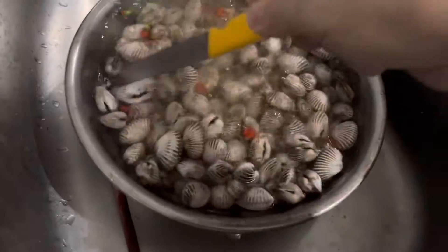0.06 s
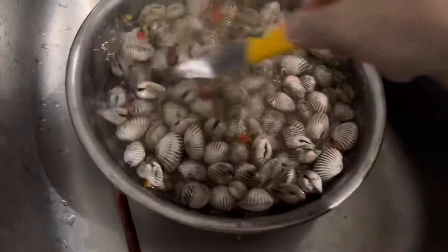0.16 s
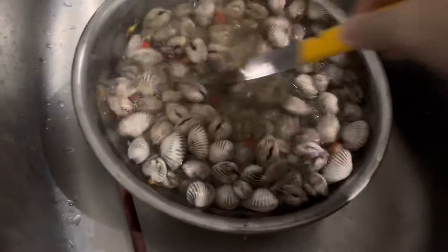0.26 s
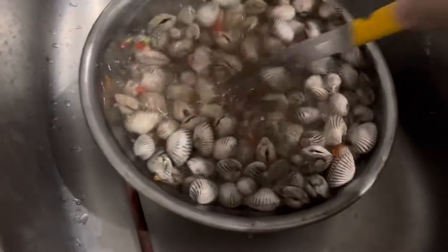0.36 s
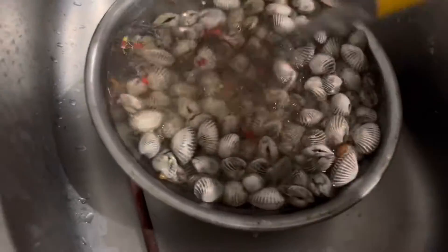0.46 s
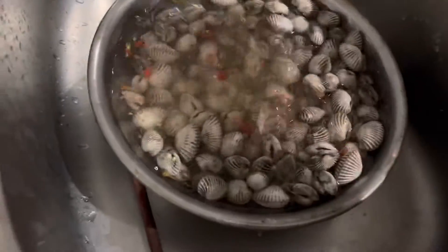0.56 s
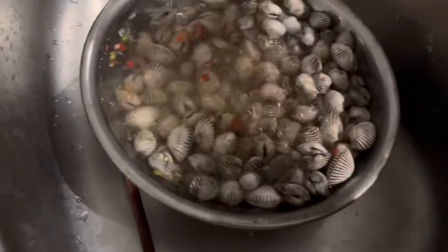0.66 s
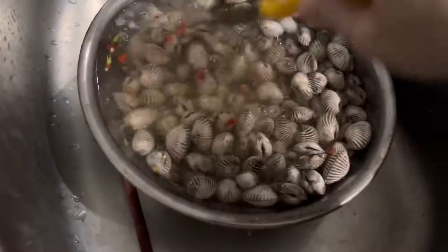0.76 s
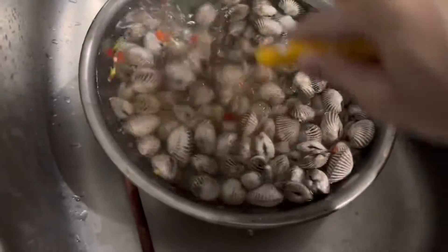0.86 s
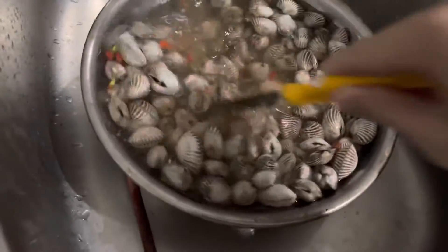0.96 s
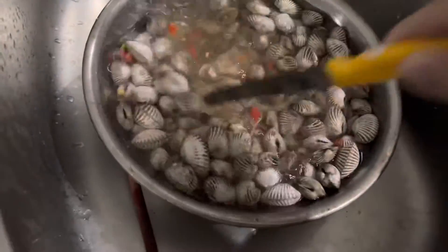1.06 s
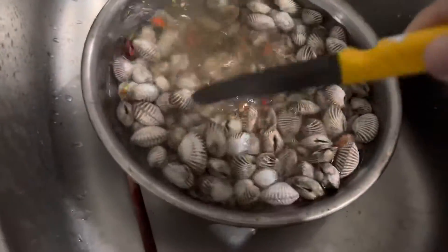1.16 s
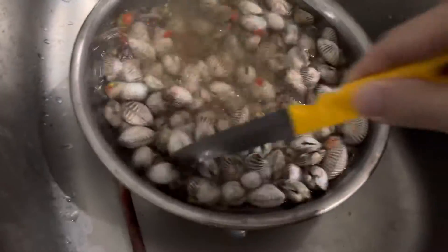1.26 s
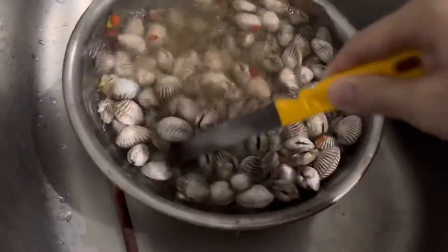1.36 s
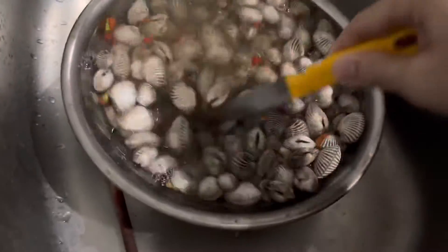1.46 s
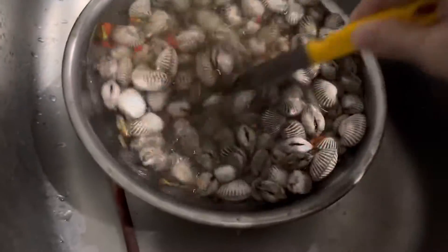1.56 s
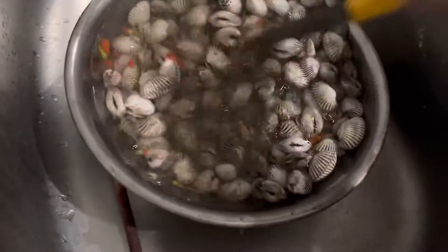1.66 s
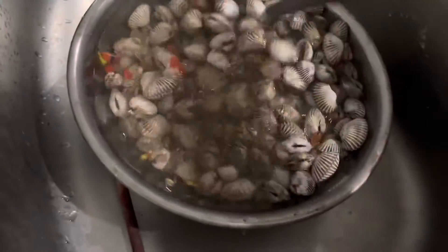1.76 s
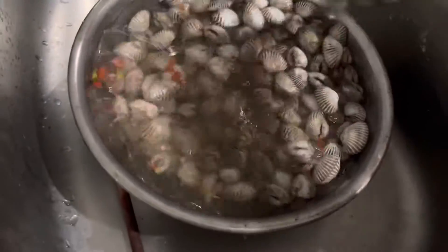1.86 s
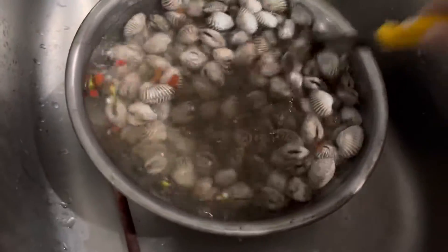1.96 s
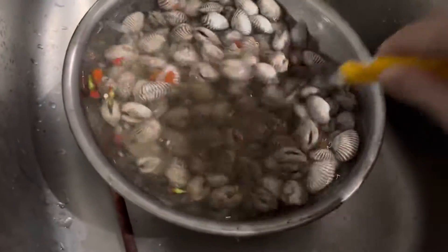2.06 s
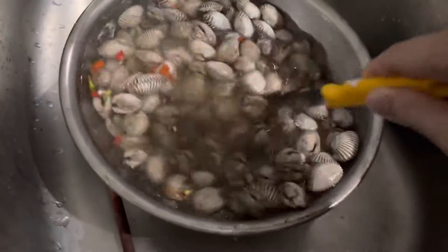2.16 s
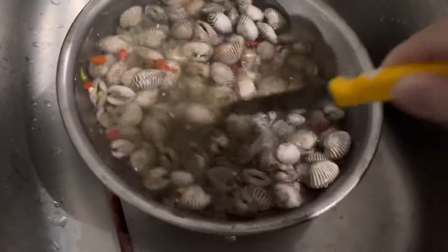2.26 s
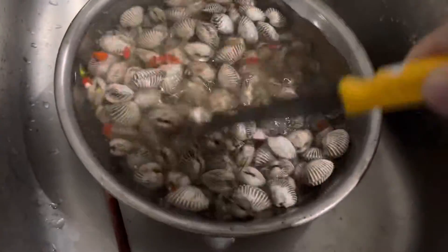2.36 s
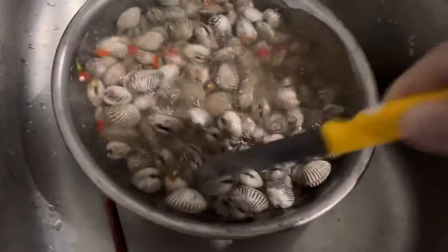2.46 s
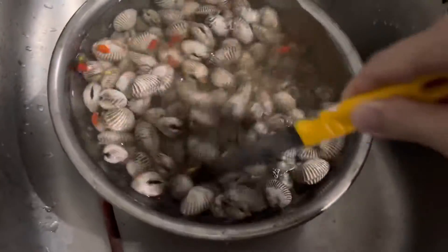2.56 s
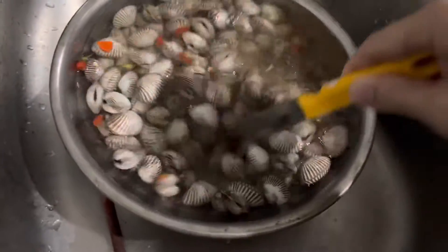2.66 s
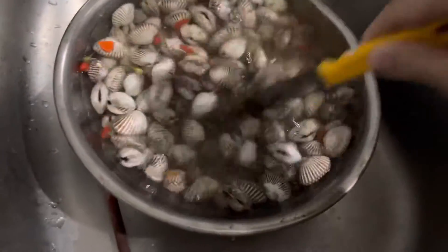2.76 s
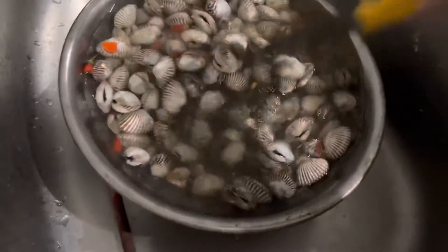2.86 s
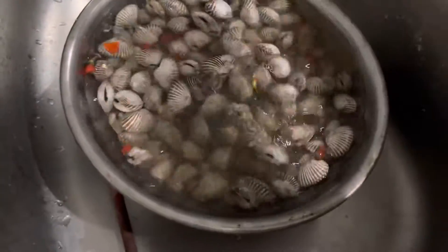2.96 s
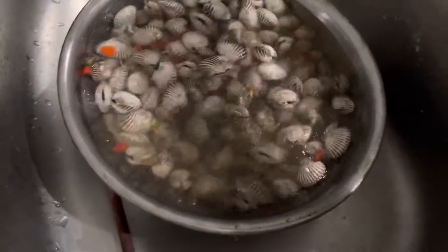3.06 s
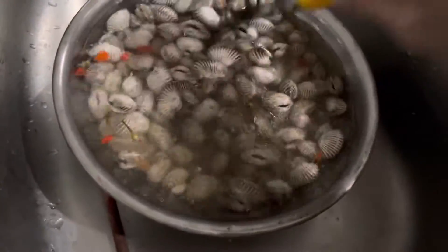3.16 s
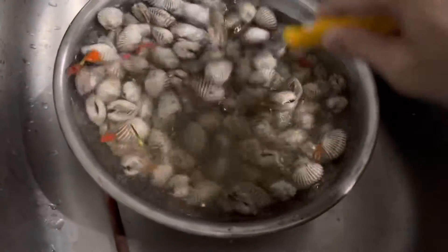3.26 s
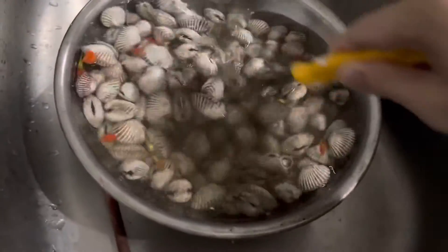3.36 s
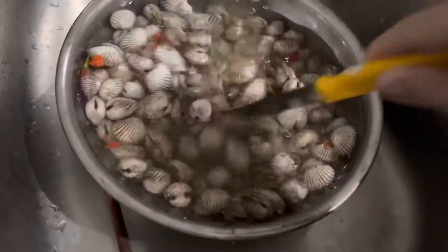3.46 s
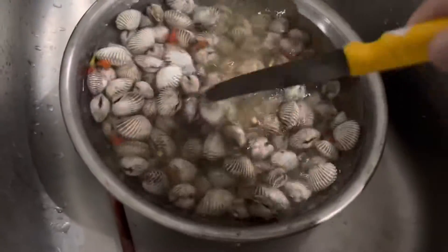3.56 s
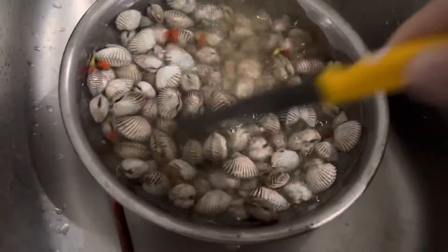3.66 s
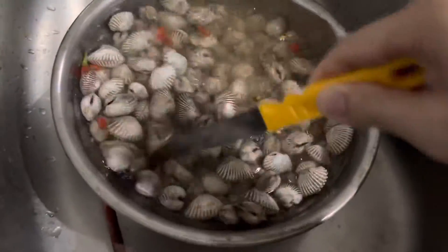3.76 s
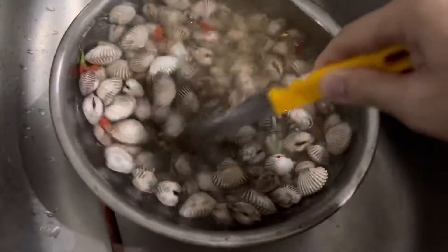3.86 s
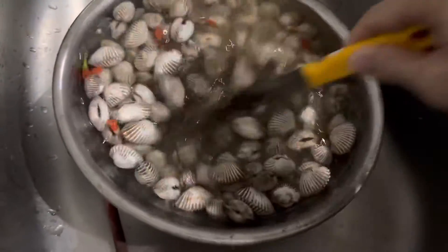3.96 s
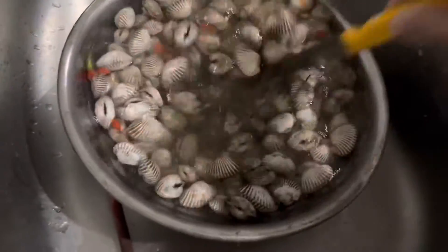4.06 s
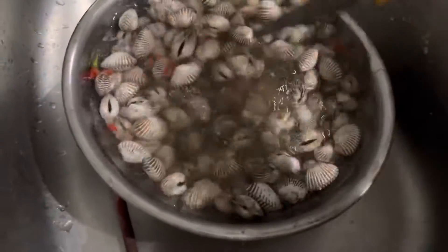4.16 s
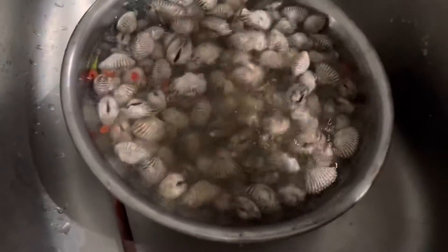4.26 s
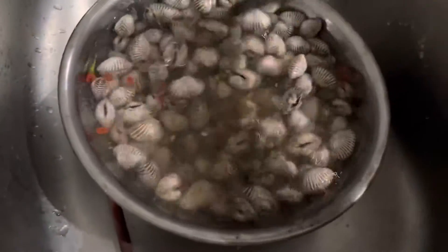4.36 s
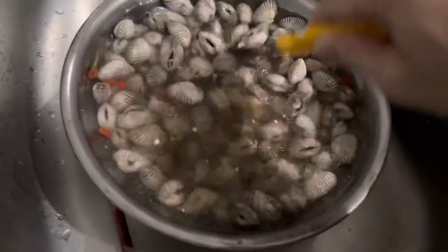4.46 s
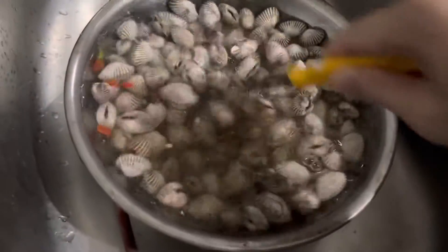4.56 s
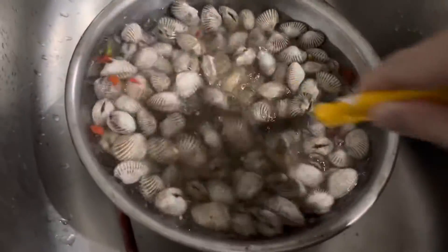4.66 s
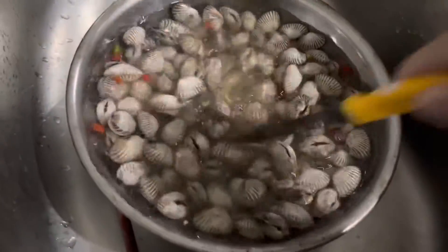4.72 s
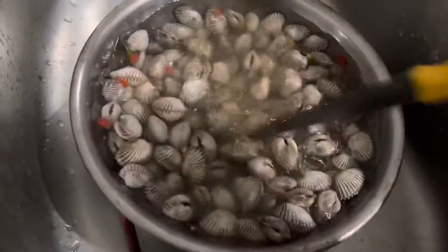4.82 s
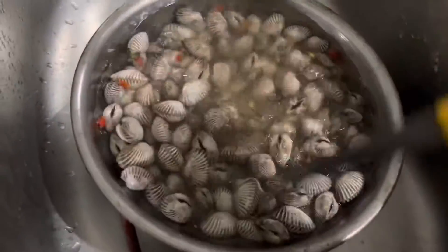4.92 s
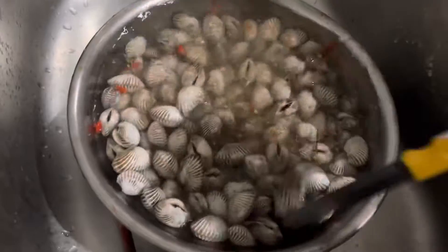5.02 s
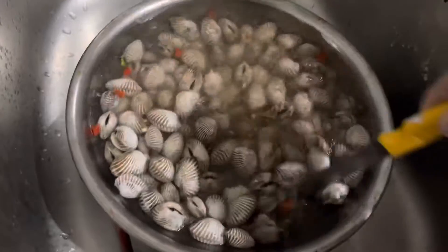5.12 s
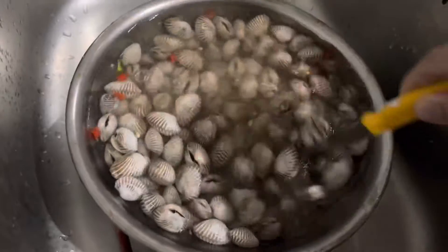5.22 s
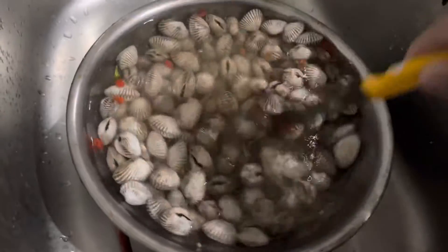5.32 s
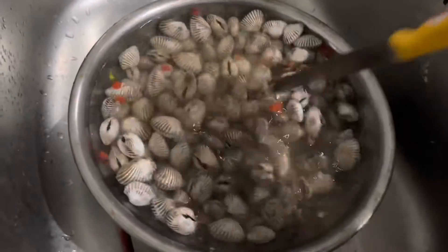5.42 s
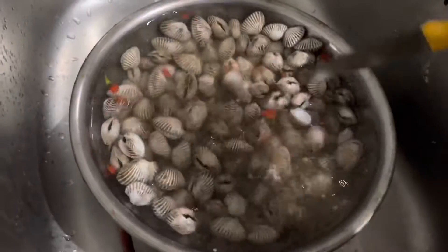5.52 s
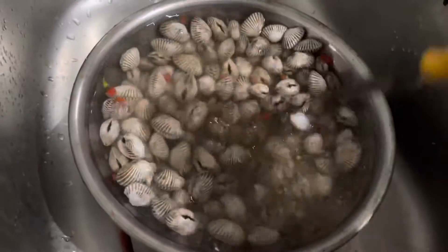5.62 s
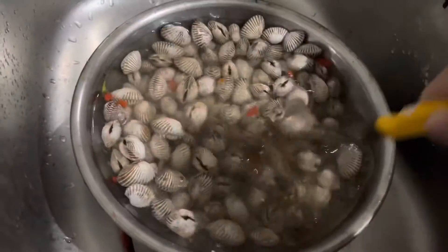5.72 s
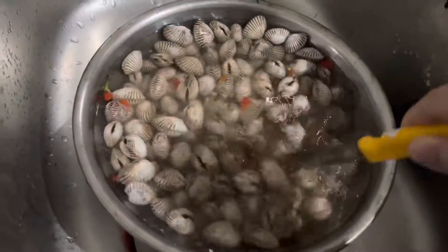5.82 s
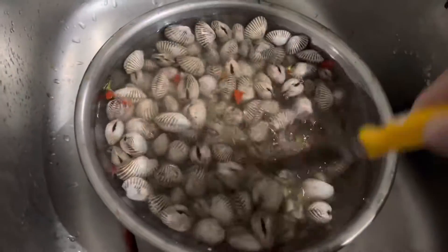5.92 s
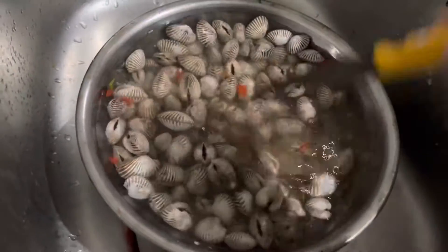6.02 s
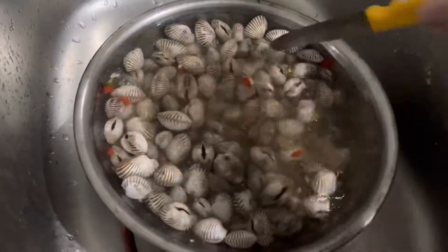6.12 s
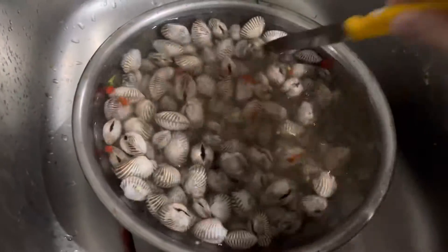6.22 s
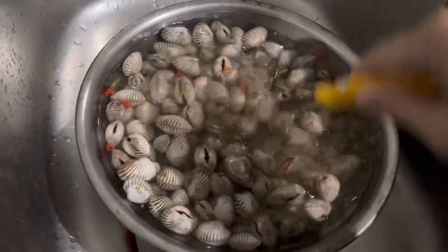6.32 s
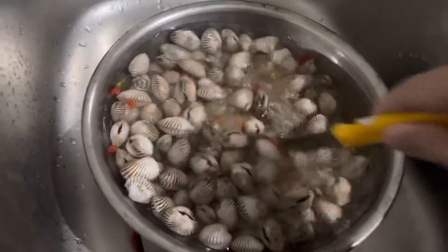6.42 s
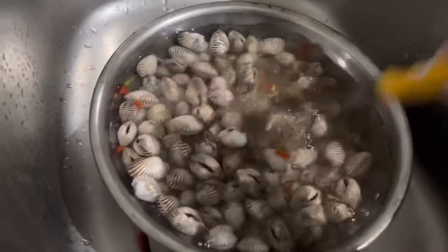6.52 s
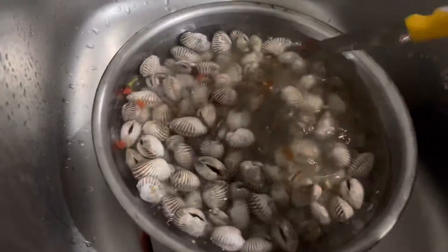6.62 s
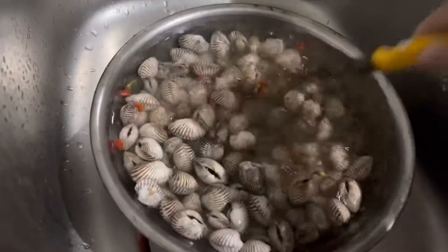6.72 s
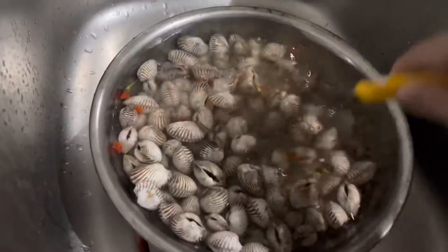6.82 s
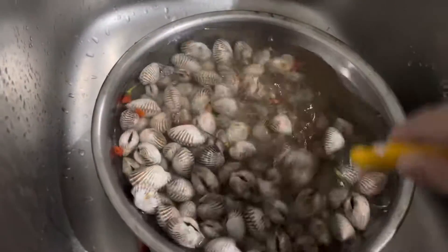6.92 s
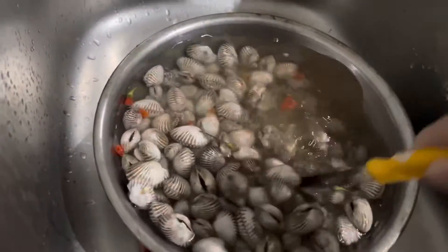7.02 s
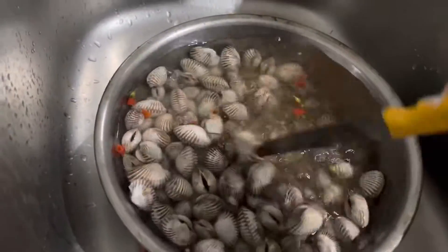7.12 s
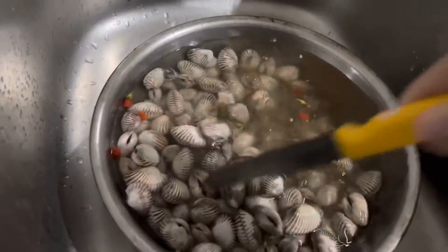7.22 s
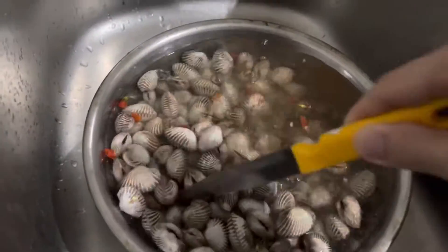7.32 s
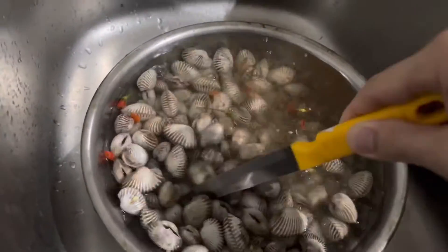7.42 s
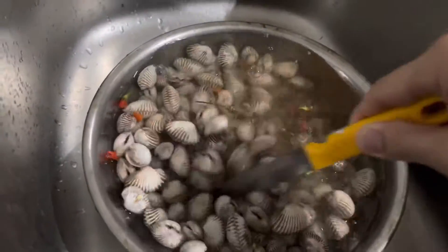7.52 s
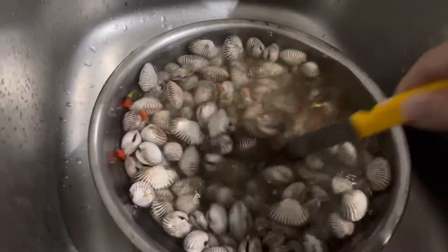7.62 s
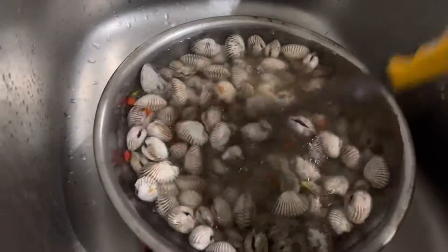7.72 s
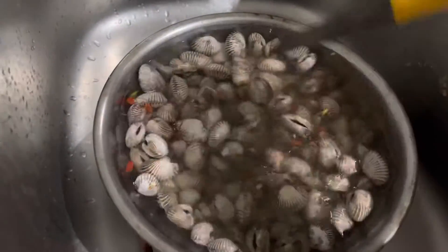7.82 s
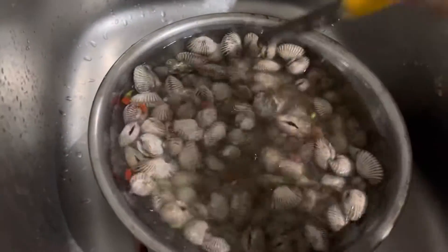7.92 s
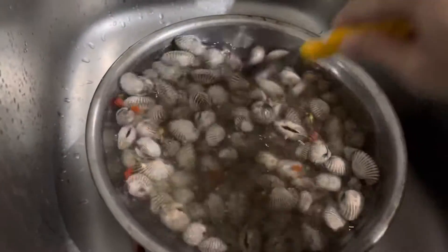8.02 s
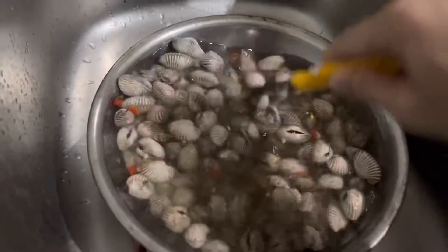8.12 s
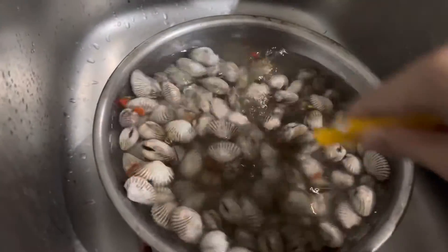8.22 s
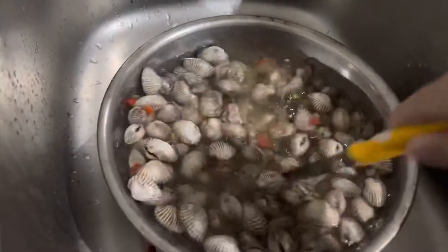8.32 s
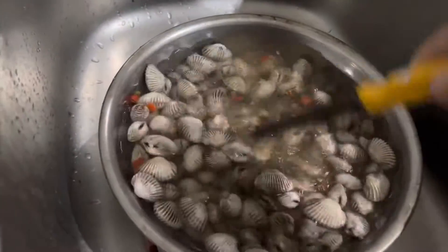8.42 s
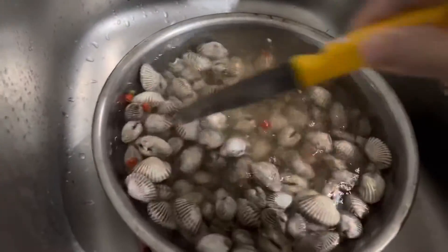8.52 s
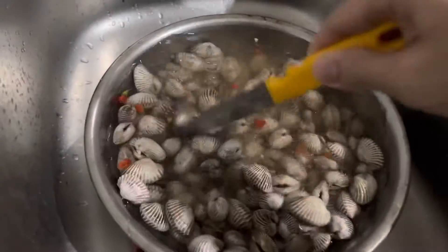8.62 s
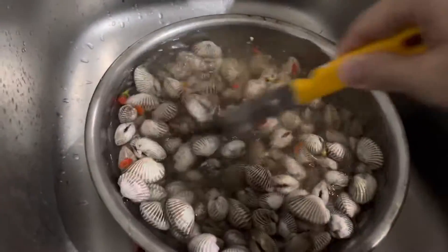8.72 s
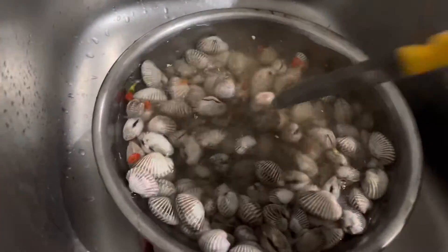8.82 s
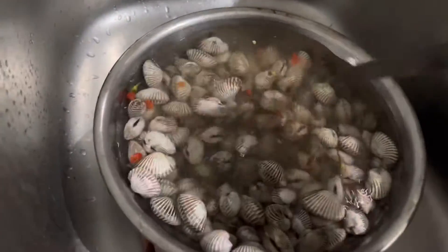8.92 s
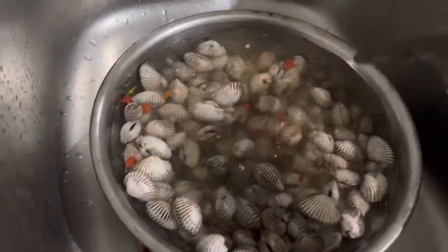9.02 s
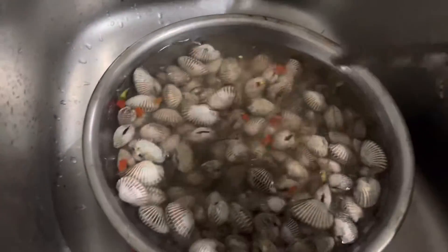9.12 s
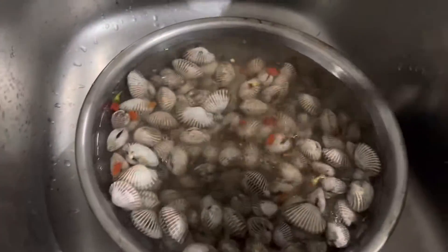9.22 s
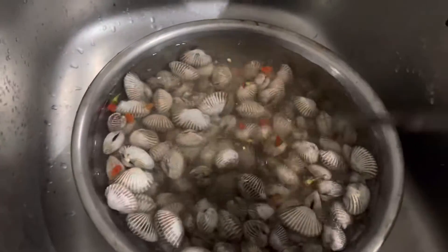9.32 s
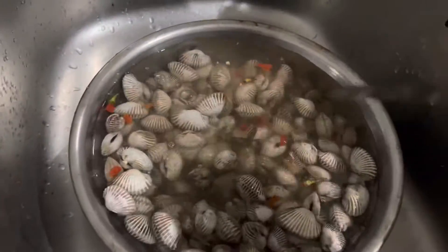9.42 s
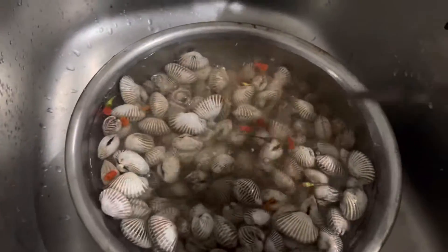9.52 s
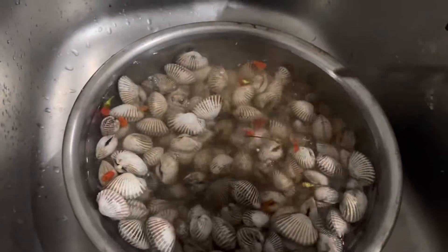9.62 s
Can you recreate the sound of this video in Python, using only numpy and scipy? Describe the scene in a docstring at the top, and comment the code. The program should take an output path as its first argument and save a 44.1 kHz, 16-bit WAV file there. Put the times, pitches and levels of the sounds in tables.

```python
"""Cockles grind and clatter as a knife stirs them in a steel bowl of water: fourteen strokes and a short dip.
Each stroke ticks on the top shells, bumps the bowl on the kitchen sink's floor and ploughs through
the heap. Shells grind under water and click above it, bowl and sink ring, the water gulps and settles.
A close stereo microphone hears it over short echoes and the room's faint rumble and hiss."""
import sys
import numpy as np
from scipy import signal
from scipy.fft import rfft, irfft, next_fast_len
from scipy.io import wavfile
from scipy.ndimage import map_coordinates

SR = 44100
rng = np.random.default_rng(int(sys.argv[2]) if len(sys.argv) > 2 else 0)


def wrap_up_sound(samples):
    """Save the sound to the file named by the first command line argument, as 16-bit audio."""
    columns = np.atleast_2d(samples).T
    # keep every value between -1 and 1, then stretch to whole-number steps
    tamed = np.clip(columns, -1, 1)
    steps = np.round(tamed * 32767).astype(np.int16)
    wavfile.write(sys.argv[1], SR, steps)


N = 426888
TOP_HZ = 16100

# knife strokes: (touch [s], touch to plunge [s], touch to crest [s], grinding at plunge [dB],
# grinding at crest [dB], clatter at crest [dB], settling [dB/s], touch tick [dB], bump [dB])
KNIFE_STROKES = [ (0.0198, 0.031, 0.23, -31.5, -22, -23, 68.5, -19, -19),
                 (0.6978, 0.023, 0.2, -25, -23, -25, 83.5, -12.5, -17.5),
                 (1.261, 0.035, 0.2, -29, -18.5, -22, 70, -13.5, -28.5),
                 (1.932, 0.028, 0.19, -29.5, -21.5, -22.5, 91, -10, -28),
                 (2.4534, 0.076, 0.16, -32.5, -20, -22.5, 53.5, -13, -28.5),
                 (3.0905, 0.029, .239, -35, -18.5, -22, 85.5, -13, -19.5),
                 (3.7324, 0.044, 0.21, -27, -18.5, -23.5, 62, -20, -21),
                 (4.372, 0.011, 0.24, -31, -21, -28, 88.5, -10.5, -28.5),
                 (4.9771, 0.072, 0.18, -35.5, -23.5, -23, 63, -15.5, -31),
                 (5.6458, 0.016, 0.15, -30, -28.5, -27.5, 46, -13.5, -26.5),
                 (6.204, 0.016, 0.12, -33.5, -18, -23, 80.5, -8.5, -20),
                 (6.7451, 0.062, .145, -31.5, -19.5, -23, 70.5, -14, -33.5),
                 (7.2873, 0.016, 0.29, -33.5, -21, -29.5, 83.5, -15, -26),
                 (7.9753, 0.016, 0.22, -29.5, -18, -22, 70.5, -13, -19.5),
                 (8.6316, .04, 0.041, -30, -29.5, -35.5, 133, -14.5, -35)]
# resonances of the bowl in the sink: (frequency [Hz], width [Hz], lift [dB])
BOWL_MODES = [(221.2, 15, 8.5), (315.3, 12.2, 12.5), (423, 52, 3.5), (499, 57, 7), (544, 30.5, 12.5),
              (669.5, 12, 8), (794, 19, 7.5), (851, 35, 8.5), (1012, 101, 11), (1251, 42, 4.5),
              (1467, 29, 6.5), (1676, 80, 10.5), (1930, 60, -12), (2507, 60, 8), (2923, 75, 10.5)]
# hollow slosh spectrum: (frequency [Hz], level [dB])
SLOSH_SPECTRUM = [(30, -20.5), (70, -4.5), (160, -6.5), (270, -4.5), (450, -0.5), (700, -9.5),
                  (1500, -19.5), (3000, -23), (9000, -55)]


def amp(db):
    """Decibels to gain."""
    return 10 ** (np.asarray(db) / 20)


def unit(x):
    """Scale to rms 1."""
    return x / np.sqrt(np.mean(x ** 2) + 1e-20)


def along(points, hz):
    """Read (Hz, value) points on a log axis."""
    f, v = np.transpose(points)
    return np.interp(np.log(hz + 1), np.log(f + 1), v)


def add(track, s, sound):
    """Mix a sound into a track at time s."""
    start = max(0, round(s * SR))
    part = track[start:start + len(sound)]
    part += sound[:len(part)]


def filtered(x, response):
    """Apply a complex function of frequency to x."""
    m = next_fast_len(N + SR // 2)
    return irfft(rfft(x, m) * response(np.fft.rfftfreq(m, 1 / SR)), m)[..., :N]


def through(x, response):
    """Convolve with an impulse response."""
    return signal.oaconvolve(x, response)[:N]


def body(spectrum, modes=(), size=16384):
    """Minimum-phase impulse response of energy 1: a broad spectrum plus resonances."""
    hz = np.fft.rfftfreq(size, 1 / SR)
    lift = 1 + sum((amp(db) ** 2 - 1) / (1 + (2 * (hz - f) / width) ** 2) for f, width, db in modes)
    cepstrum = irfft(np.log(amp(along(spectrum, hz)) * np.sqrt(np.abs(lift))))
    cepstrum[1:size // 2] *= 2
    cepstrum[size // 2 + 1:] = 0
    response = irfft(np.exp(rfft(cepstrum)))
    return response / np.linalg.norm(response)


def collisions(level_db, per_s, spread_db):
    """Random impulses, per_s at -25.5 dB; a harder push makes them denser and bigger."""
    chance = np.clip(per_s * amp(.38 * (level_db + 25.5)) / SR, 1e-5, 1)
    size = unit(amp(spread_db * np.minimum(rng.standard_normal(N), 1.8)))
    hits = (rng.random(N) < chance) * size * rng.choice([-1, 1], N)
    return hits * amp(level_db) / np.sqrt(chance)


def hush():
    """Low rumble and faint hiss of the room."""
    # room noise: (frequency [Hz], level [dB])
    spectrum = [(15, -37.5), (25, -21.5), (64, -4), (93, -14), (135, -7), (212, -31.5), (240, -24),
                (366, -29.5), (900, -39), (2420, -44.5), (4740, -51.5), (6200, -51), (7100, -38),
                (7700, -53), (9500, -72), (12400, -103), (20900, -120)]
    mid, side = unit(filtered(rng.standard_normal((2, N)), lambda hz: amp(along(spectrum, hz))))
    return amp(-47) * np.array([mid + amp(-10) * side, mid - amp(-40.5) * side])


def shell_click(ring_hz=4780, ring_t60_s=.07, crack_t60_s=.028, scatter_t60_s=.086):
    """One contact: a hard crack, its scatter among the shells and six inharmonic modes."""
    t = np.arange(SR // 12) / SR
    hz = ring_hz * np.exp(rng.uniform(-.6, .64, size=6))
    ring = unit(np.sin(2 * np.pi * hz[:, None] * t).sum(0)) * amp(-9.5 - 60 * t / ring_t60_s)
    fade = amp(-60 * t / crack_t60_s) + amp(-7 - 60 * t / scatter_t60_s)
    return rng.standard_normal(len(t)) * fade + ring


def contacts(touch_knock_db=-13.5, glint_db=-11):
    """The blade hits a shell, skips on its ribs and knocks the bowl; its edge glints. Drips come last."""
    # shell ticks, bowl knocks and a few faint last drips: (time [s], tick [dB], knock [dB])
    impacts = [(0.053, -16, -20), (0.1224, -6.5, -32.5), (0.1352, -13, -13), (0.2228, -10.5, -13.5),
               (0.4082, -14, -31), (0.599, -31, -40), (0.6555, -15, -21.5), (0.962, -6, -11),
               (1.294, -18, -14), (2.4705, -21.5, -30), (2.5988, -9, -27), (3.1187, -7, -23),
               (3.1667, -14, -35), (3.7628, -8, -15), (4.148, -17, -14), (4.3156, -22, -45.5),
               (4.573, -13.5, -15), (5.013, -15.5, -21.5), (5.0985, -13, -33), (5.3313, -13, -30),
               (5.848, -13.5, -26.5), (5.962, -19.5, -42), (6.2958, -4.5, -11), (6.3592, -5.5, -13),
               (6.794, -11.5, -31), (6.982, -13, -11), (7.211, -23, -34), (7.5369, -10.5, -16),
               (7.7922, -19.5, -22), (7.9851, -5, -16.5), (8.6786, -11, -22.5), (8.7255, -13, -16.5),
               (8.7623, -16.5, -41.5), (8.9332, -37, -26.5), (9.1803, -54, -48), (9.266, -47.5, -42),
               (9.42, -53, -55)]
    # spectra of shell tick, steel edge and bowl knock: (frequency [Hz], level [dB])
    tick_spectrum = [(300, -24), (1200, -1.5), (2800, 5), (5000, 3.5), (8500, 2), (12000, -1.5),
                     (16000, -18)]
    glint_spectrum = [(2500, -14.5), (5500, 4.5), (8000, 6.5), (12000, -2.5), (16000, -3.5)]
    knock_spectrum = [(60, -36), (250, -5.5), (480, -1), (900, -9.5), (1600, -10), (3000, -16.5),
                      (9000, -45)]
    ticks, knocks = np.zeros((2, N))
    touches = [(s, tick_db, tick_db + touch_knock_db) for s, *_, tick_db, _ in KNIFE_STROKES]
    for s, tick_db, knock_db in touches + impacts:
        for delay_s, skip_db in ((0, 0), (rng.uniform(.004, .011), -7)):
            add(ticks, s + delay_s, amp(tick_db + skip_db - 11.5) * shell_click())
        add(knocks, s, amp([knock_db + 17.5]))
    shell = through(ticks, body(tick_spectrum))
    glint = amp(glint_db) * through(ticks, body(glint_spectrum))
    return shell + glint + through(knocks, body(knock_spectrum, BOWL_MODES))


def swell(t, plunge_s, crest_s, entry_db, crest_db, settle_db_per_s, bite_db=12, hold_s=.077):
    """Stroke level in dB, t seconds after the touch: bite, growing push, crest, settling."""
    times_s = [0, plunge_s, max(crest_s, plunge_s)]
    rise_db = np.interp(t, times_s, [entry_db - bite_db, entry_db, crest_db], left=-120)
    return rise_db - settle_db_per_s * np.maximum(t - crest_s - hold_s, 0)


def jams(depth_db=1.64, per_s=24):
    """Shells jam and give way: a smooth random level change in dB."""
    knots = rng.standard_normal(int(N * per_s / SR) + 4)
    return depth_db * map_coordinates(knots, [np.arange(N) * per_s / SR])


def surges(t, half_width_s=.026):
    """Lift in dB as a clump of shells gives way, under the blade or sliding back."""
    # slipping clumps: (time [s], grinding lift [dB], clatter lift [dB])
    clumps = [(0.14, 1.5, 3), (0.314, 3, -1.5), (0.515, 3, 3.5), (0.93, 6.5, 1), (1.136, 9, 4.5),
              (1.486, 2, -1), (1.80, 2.5, 2.5), (2.39, 8, -2), (2.755, 3.5, 1.5), (2.989, 7.5, 5),
              (3.415, 1.5, 1), (3.845, 3, -8), (3.975, 2, 5.5), (4.615, 6, 8.5), (5.105, 0.5, 8.5),
              (5.191, 4.5, -0.5), (5.464, 6.5, 0.5), (6.81, 2.5, 2.5), (6.89, 2.5, 1.5), (7.588, 3.5, 7),
              (8.25, 2, 2.5), (8.955, 18, 6)]
    return sum(np.outer(lifts_db, np.exp(-((t - s) / half_width_s) ** 2)) for s, *lifts_db in clumps)


def stirring(surface_settle_ratio=1.21):
    """Grinding and clatter levels in dB; each stroke takes over as the one before settles."""
    t = np.arange(N) / SR
    grind_db = clatter_db = np.full(N, -120.)
    for s, plunge_s, crest_s, entry_db, crest_db, surface_crest_db, db_per_s, _, _ in KNIFE_STROKES:
        submerged_db = swell(t - s, plunge_s, crest_s, entry_db, crest_db, db_per_s)
        surface_entry_db = -26.5 + .85 * (entry_db + 30)
        surface_db = swell(t - s, plunge_s, crest_s, surface_entry_db, surface_crest_db,
                           surface_settle_ratio * db_per_s)
        grind_db = np.maximum(grind_db, submerged_db)
        clatter_db = np.maximum(clatter_db, surface_db)
    return np.array([grind_db, clatter_db]) + jams() + surges(t)


def grinding(level_db):
    """Gentle motion sloshes; a hard push scrapes shells over the steel. Both ring the bowl."""
    # submerged scrape: (frequency [Hz], level [dB])
    scrape_spectrum = [(60, -20), (260, -8.5), (500, -3), (1000, -1.5), (1900, -3.5), (3000, -10.5),
                       (5000, -10), (9000, -21), (16000, -59.5)]
    push_db = level_db + 24.5
    soft_hits = collisions(level_db - .22 * push_db, per_s=1100, spread_db=5.5)
    hard_hits = collisions(level_db + .18 * push_db, per_s=1400, spread_db=1.5)
    slosh = through(soft_hits, body(SLOSH_SPECTRUM, BOWL_MODES))
    scrape = through(hard_hits, body(scrape_spectrum, BOWL_MODES))
    return amp(-5) * slosh + amp(-1) * scrape


def clatter(level_db, crack_t60_s=.031, ring_t60_s=.028, ring_hz=5200):
    """Shells click together at the surface, each click with its own crack and pitch."""
    # shells in air: (frequency [Hz], level [dB])
    spectrum = [(300, -31.5), (1200, -7.5), (2500, 4), (4300, 4), (5600, -2), (8500, 0), (11500, -7),
                (16000, -18.5)]
    hits = collisions(level_db, per_s=1200, spread_db=3)
    t = np.arange(400) / SR
    fade = amp(-60 * t / crack_t60_s) ** 2
    crack_power = np.abs(through(hits ** 2, fade / fade.sum()))
    cracks = rng.standard_normal(N) * np.sqrt(crack_power)
    onsets = np.flatnonzero(hits)
    hz = np.minimum(ring_hz * np.exp(.455 * rng.standard_normal(N)[onsets]), TOP_HZ)
    ring = np.sin(2 * np.pi * hz[:, None] * t) * amp(-60 * t / ring_t60_s)
    ring *= (hits[onsets] / np.linalg.norm(ring, axis=1))[:, None]
    samples = onsets[:, None] + np.arange(len(t))
    rings = np.bincount(samples.ravel(), ring.ravel(), N)[:N]
    return through(amp(-4) * cracks + amp(-8) * rings, body(spectrum))


def bumps(flex_hz=65, t60_s=.68, attack_s=.0072):
    """Each plunge flexes the thin sink floor and heaves the water: a loose low rumble."""
    # heaving water: (frequency [Hz], level [dB])
    spectrum = [(25, -17.5), (50, 3.5), (120, -1.5), (200, -14), (500, -47.5)]
    out, t = np.zeros(N), np.arange(SR // 2) / SR
    heave = unit(filtered(rng.standard_normal(N), lambda hz: amp(along(spectrum, hz))))
    envelope = amp(-60 * t / t60_s) * (1 - np.exp(-t / attack_s))
    for s, plunge_s, *_, bump_db in KNIFE_STROKES:
        flex = np.sin(2 * np.pi * flex_hz * np.exp(.12 * rng.standard_normal()) * t)
        boom = amp(-4) * flex + amp(-1) * heave[round(s * SR):][:len(t)]
        add(out, s + plunge_s, amp(bump_db - 8) * boom * envelope)
    return out


def wash(gain_db=-10, fade_db_per_s=110):
    """Each plunge shoves water aside: a hollow slosh that scales with its bump."""
    t = np.arange(N) / SR
    plunges_db = [np.where(t > s + plunge_s, bump_db - fade_db_per_s * (t - s - plunge_s), -120)
                  for s, plunge_s, *_, bump_db in KNIFE_STROKES]
    hits = collisions(np.max(plunges_db, axis=0) + gain_db, per_s=1500, spread_db=3)
    return through(hits, body(SLOSH_SPECTRUM, BOWL_MODES))


def bubble(hz, t60_s, glide):
    """A ringing air pocket whose pitch glides as it fades."""
    t = np.arange(int(t60_s * SR)) / SR
    phase = 2 * np.pi * hz * (t + glide * t * t / (2 * t60_s))
    return 2 * np.sin(phase) * amp(-60 * t / t60_s) * (1 - np.exp(-t * hz / 2))


def water(level_db, bubble_count=600):
    """Big air pockets gulp shut behind the blade; small bubbles follow the stirring level."""
    # air pockets: (time [s], pitch [Hz], level [dB], t60 [s], glide [share of pitch])
    gulps = [(0.712, 550, -25, 0.087, -0.32), (0.715, 455, -11, 0.122, -0.77),
             (0.762, 330, -19, 0.2, -0.26), (0.887, 348, -12.5, 0.049, 0.14),
             (5.78, 499, -22, 0.066, 0.056), (6.58, 1170, -27, .04, .2), (8.69, 488, -17.5, 0.07, .1),
             (8.938, 432, -27, .06, 0.4)]
    out = np.zeros(N)
    for s, hz, db, t60_s, glide in gulps:
        add(out, s, amp(db) * bubble(hz, t60_s, glide))
    for when, pitch, depth in rng.random((bubble_count, 3)):
        i, hz = int(when * N), 400 * 6 ** pitch
        bubble_db = level_db[i] + 2 - 12 * depth
        add(out, i / SR, amp(bubble_db) * bubble(hz, t60_s=28 / hz, glide=.28))
    return out


def tail(t60_points):
    """Diffuse decay of energy 1 from (frequency [Hz], t60 [s]) points."""
    hz, t, noise = signal.stft(rng.standard_normal(SR // 3), SR, nperseg=128)
    ring = signal.istft(noise * amp(-60 * t / along(t60_points, hz)[:, None]), SR, nperseg=128)[1]
    return ring / np.linalg.norm(ring)


def echoes(x, t60_points, hop=12288):
    """Diffuse echoes, with a fresh tail per block so no fixed pitch rings."""
    out, fade = np.zeros(N + hop), signal.get_window("hann", 2 * hop)
    padded = np.pad(x, (hop, 2 * hop))
    for i in range(0, N + hop, hop):
        add(out, i / SR, signal.fftconvolve(padded[i:i + 2 * hop] * fade, tail(t60_points)))
    return out[hop:]


def kitchen(x):
    """Direct sound and room echoes in the centre; the sink walls scatter sound in from the sides."""
    # room decay: (frequency [Hz], t60 [s])
    room_t60 = [(200, 0.59), (700, 0.32), (2000, 0.6), (6000, 0.19), (14000, 0.23)]
    # left-right likeness: (frequency [Hz], likeness [0..1])
    likeness = [(100, .99), (450, 0.97), (750, 0.92), (3000, 0.84), (4500, 0.86), (7000, 0.82), (8500, 1),
                (16000, 1)]

    def mid_side_gains(hz):
        angle_rad = np.arccos(np.clip(along(likeness, hz), -1, 1)) / 2
        return np.array([np.cos(angle_rad), np.sin(angle_rad)])

    centre = amp(-1.5) * x + amp(-10.5) * echoes(x, room_t60)
    sides = amp(5) * echoes(x, t60_points=[(300, .17), (1500, .17), (5000, .077)])
    mid, side = filtered(np.array([centre, sides]), mid_side_gains)
    return np.array([mid + side, mid - side])


def scene():
    """The stirred bowl in the kitchen; the bumps' long waves reach both channels alike."""
    grind_db, clatter_db = stirring()
    bowl = grinding(grind_db) + clatter(clatter_db) + contacts() + water(grind_db) + wash()
    return kitchen(bowl) + amp(2.5) * bumps() + hush()


def record(dry, low_cut_hz=36, ceiling=.85):
    """Microphone pair: low cut, leftward lean, treble phase offset, rounded peaks, band limit."""
    # channel balance: (frequency [Hz], left minus right [dB])
    lean_db = [(450, 0.5), (560, -0.5), (630, 9.5), (850, 5.5), (1000, -0.5), (1400, 5.5), (2100, -0.5),
               (2900, 5.5), (3600, 1), (4900, 6), (5800, 1), (7200, 3), (8600, 0)]
    # channel phase: (frequency [Hz], left lead [rad])
    lead_rad = [(1800, 0), (2800, .8), (4500, .2), (5400, .6), (6600, .1), (7400, .6), (8600, -.1),
                (9900, -3), (10600, -3.3), (11600, -6.1), (12500, -6.5), (13400, -9.3), (14100, -9.6),
                (15000, -12.4), (16000, -12.8)]
    half = np.array([[.5], [-.5]])
    cut = signal.sosfilt(signal.butter(4, low_cut_hz, "highpass", fs=SR, output="sos"), dry)
    heard = filtered(
        cut, lambda hz: amp(half * along(lean_db, hz)) * np.exp(1j * half * along(lead_rad, hz)))
    rounded = heard / (1 + np.abs(heard / ceiling) ** 6) ** (1 / 6)
    return filtered(rounded, lambda hz: hz < TOP_HZ)


dry = scene()
out = record(dry)
wrap_up_sound(out)
```